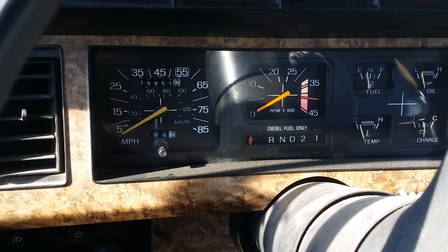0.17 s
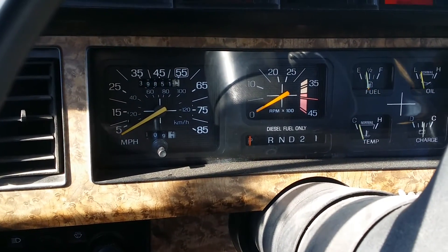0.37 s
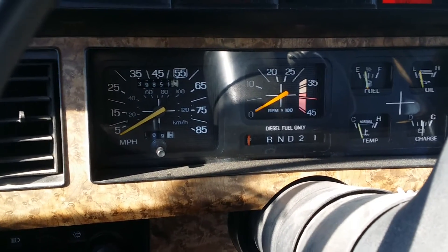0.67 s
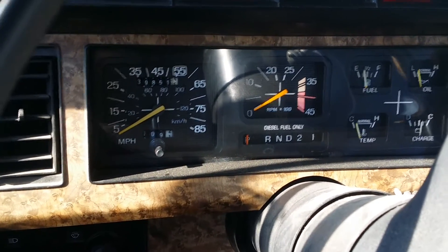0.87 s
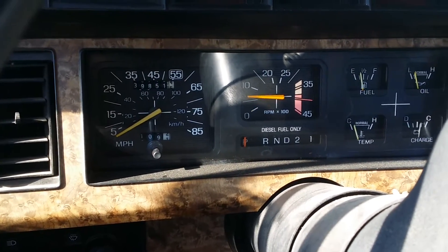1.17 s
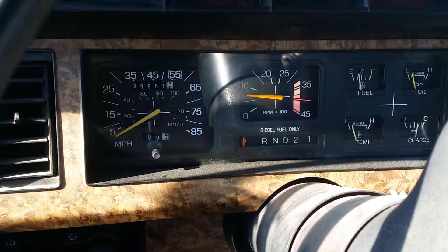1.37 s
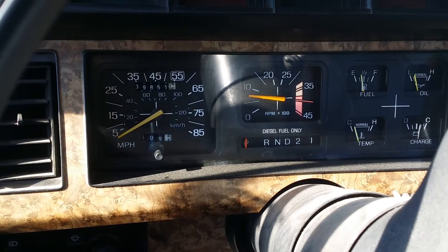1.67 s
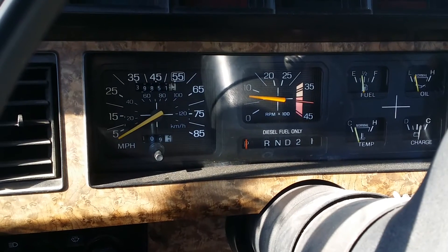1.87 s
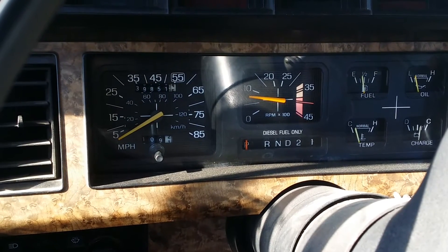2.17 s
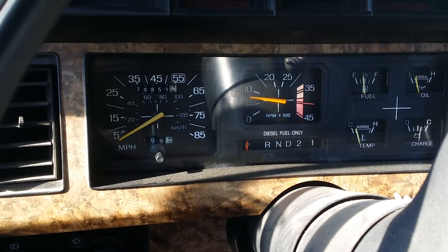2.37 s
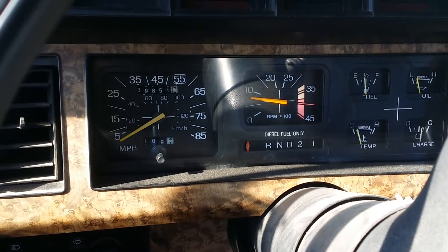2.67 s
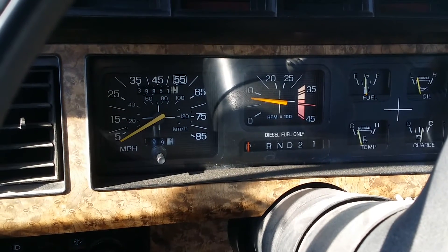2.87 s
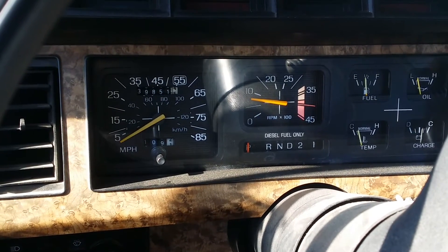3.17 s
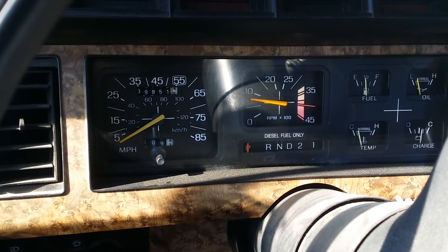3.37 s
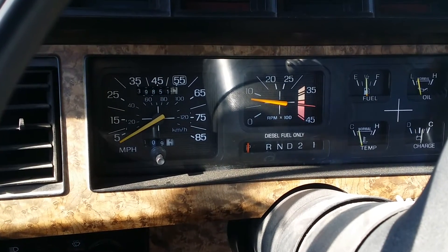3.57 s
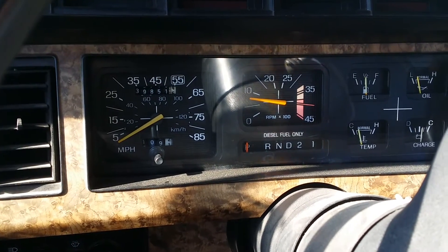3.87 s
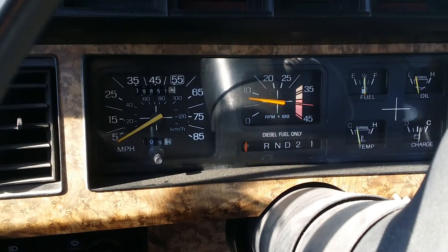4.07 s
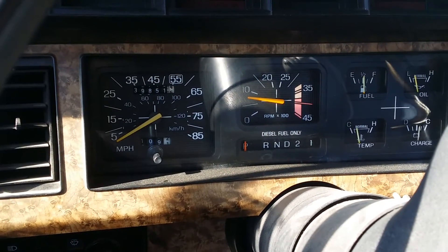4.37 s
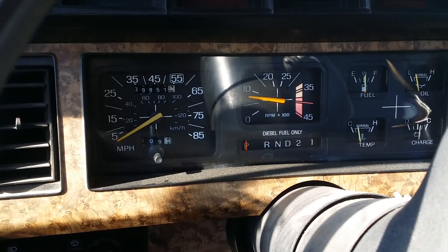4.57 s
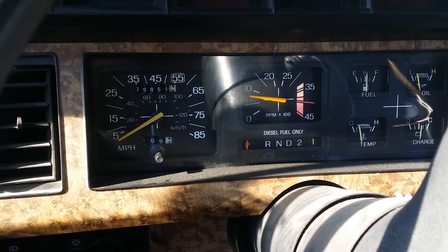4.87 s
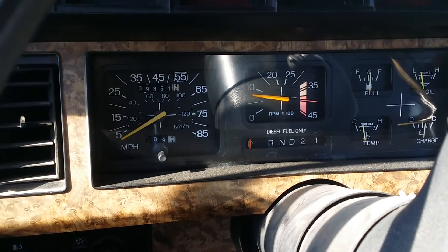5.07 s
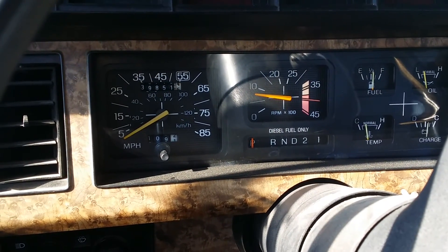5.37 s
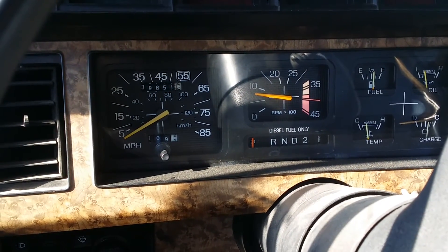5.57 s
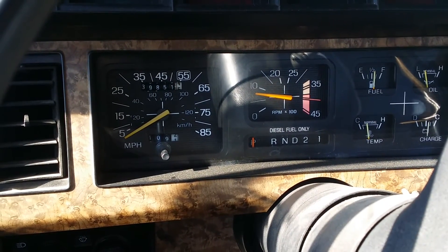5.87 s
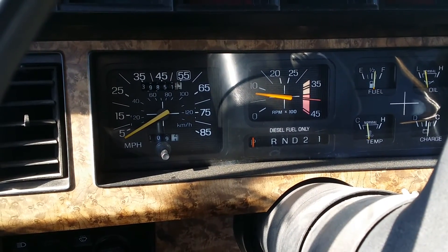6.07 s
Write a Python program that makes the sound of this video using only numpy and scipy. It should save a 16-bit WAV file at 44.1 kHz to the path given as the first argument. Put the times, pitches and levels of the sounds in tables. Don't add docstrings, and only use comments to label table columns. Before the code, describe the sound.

Close hand-held recording in a vehicle cab: quiet hum, lock ticks, then a starter bites and grinds for barely half a second. Low jolts shake plastic and keys as a big diesel fires. It idles roughly and evenly paced, with panel ringing, injector clatter, hiss and a thin belt whine. A loud electrical thump and short silence interrupt before the mono sound opens to stereo, and the idle continues.

```python
import sys
import numpy as np
from scipy import signal
from scipy.fft import rfft, irfft, next_fast_len
from scipy.io import wavfile
from scipy.ndimage import map_coordinates

SR = 44100
rng = np.random.default_rng(int(sys.argv[2]) if len(sys.argv) > 2 else 0)


def linear_from_db(decibels):
    return 10 ** (np.asarray(decibels, float) / 20)


def log_audio(samples):
    frames = np.atleast_2d(samples).T
    limited = np.clip(frames, -1, 1)
    pcm = np.round(limited * 32767).astype(np.int16)
    wavfile.write(sys.argv[1], SR, pcm)


N = 274610
T_S = np.arange(N) / SR
SWITCH_S = 2.7472
STARTER_ON_S = 0.3014


def unit(x):
    return x / np.sqrt(np.mean(x ** 2, axis=-1, keepdims=True) + 1e-20)


def along(points, hz):
    point_hz, value = np.transpose(points)
    return np.interp(np.log(hz + 1), np.log(point_hz + 1), value)


def curves(rows):
    s, *columns = np.transpose(rows)
    return [np.interp(T_S, s, column) for column in columns]


def wobble(rate_hz):
    knots = rng.standard_normal(int(N * rate_hz / SR) + 4)
    return map_coordinates(knots, [np.arange(N) * rate_hz / SR])


def noise():
    return rng.standard_normal((2, N))


def filtered(x, response):
    m = next_fast_len(N + 8192)
    return irfft(rfft(x, m) * response(np.fft.rfftfreq(m, 1 / SR)), m)[..., :N]


def coloured(x, spectrum):
    return unit(filtered(x, lambda hz: linear_from_db(along(spectrum, hz))))


def tone(hz):
    return 2 * np.pi * np.cumsum(hz) / SR


def engine():
    cycle = crank()
    return boom(cycle) + combustion(cycle) + clatter(cycle) + rumble() + grit(cycle)


# time in seconds, cycles of two crank turns in Hz.
SPEED = [(.3, 1.5), (.6, 3), (.8, 6), (.94, 6.52), (1.06, 6.82), (1.3, 6.94), (1.7, 6.96), (1.9, 7.005),
         (2.3, 7.04), (2.7, 7.1), (3.3, 7.105), (3.7, 7.08), (3.9, 7.05), (4.3, 7.035), (4.5, 7.052),
         (4.9, 7.052), (5.5, 7.076), (6.23, 7.11)]


def crank():
    strong_before_s, strong_after_s = 1.5577, 3.4879
    turns = np.cumsum(curves(SPEED)[0]) / SR
    before, after = turns[round(strong_before_s * SR)], turns[round(strong_after_s * SR)]
    return turns - np.where(T_S < SWITCH_S, before, after)


def layer_db(idle_db, growth, swells=()):
    idle_hz, solenoid_s = 7.05, 0.0078
    speed_db = 20 * np.log10(curves(SPEED)[0] / idle_hz)
    power = linear_from_db(idle_db + growth * speed_db) ** 2
    for s, db, rise_s, fall_s in swells:
        away = np.maximum((s - T_S) / rise_s, (T_S - s) / fall_s)
        power = power + linear_from_db(db - 20 * away) ** 2
    return 10 * np.log10(power) - 40 * np.clip((STARTER_ON_S - T_S) / solenoid_s, 0, 3)


# multiple of the cycle rate, level in dB.
ORDERS = [(7, -25), (8, 0), (9, -17), (10, -7), (11, -5), (12, -30), (13, -14), (14, -8), (15, -15),
          (16, 1), (17, -5), (18, -11), (19, -5), (20, -8), (21, -7), (22, -14), (23, -14), (24, -14),
          (25, -10), (26, -10), (27, -12), (28, -12), (29, -11), (30, -19), (31, -26), (32, -28), (33, -18),
          (34, -13), (35, -29), (36, -25), (37, -14)]


def order_kick(order):
    if order in (8, 16):
        early_cycles, radians = 0, -.9
    elif order > 24:
        early_cycles, radians = .088, -2.1
    elif order > 21:
        early_cycles, radians = .446, 2.1
    elif order > 15:
        early_cycles, radians = -.029, 3.6
    else:
        early_cycles, radians = -.175, 1.
    return 2 * np.pi * order * early_cycles + radians


def boom(cycle):
    scatter_rad, drift_rad, sway_db = .2, .22, 1.6
    out = np.zeros(N)
    for order, db in ORDERS:
        phase = order_kick(order) + rng.normal(0, scatter_rad) + drift_rad * wobble(3.37)
        out += linear_from_db(db + sway_db * wobble(2.51)) * np.cos(2 * np.pi * order * cycle + phase)
    return linear_from_db(layer_db(-24, 3.3)) * unit(out)


RINGS = {590: [(.01, -18.5), (.23, -11), (.5, -23.5), (.71, -14), (.83, -16)], 835: [(.05, -8), (.17, -8),
         (.29, -7), (.43, -8), (.48, -9.5), (.61, -7), (.72, -1.5), (.9, -3.5)], 1027: [(.07, -3),
         (.345, -7.5), (.385, -8), (.5, -9), (.83, -8), (.96, -2.5)], 1233: [(.33, -9), (.41, -8),
         (.51, -7.5), (.6, -15), (.78, -10.5), (.93, -1)], 1380: [(.17, -9.5), (.32, -7), (.43, -3),
         (.57, -7.5), (.66, 1), (.82, -16), (.98, -11)], 1600: [(.17, -16.5), (.29, -22.5), (.43, -1.5),
         (.59, -15.5)], 1831: [(.09, -5), (.21, 2.5), (.3, -6.5), (.47, 0.5), (.59, -4), (.72, -2.5),
         (.85, -6)], 2050: [(.05, -11), (.17, -3), (.31, -5.5), (.56, -3.5), (.7, -3.5), (.8, -15)],
         2600: [(.33, -13.5), (.55, -20), (.71, -16)], 3180: [(.07, -19.5), (.15, -17), (.46, -20),
         (.55, -19), (.74, -17)]}


def combustion(cycle):
    half_cycles, size_scatter_db = .043, 2
    drift_rad, bend, pitch_spread = .5, .02, .008
    out = np.zeros((2, N))
    count = cycle - np.floor(cycle.min()) + 1
    period_s = 1 / curves(SPEED)[0]
    for hz, strokes in RINGS.items():
        for at, db in strokes:
            size, pitch, *steps = rng.standard_normal((4, int(count.max()) + 2))
            off = (cycle - at + .5) % 1 - .5
            near = np.flatnonzero(np.abs(off) < 3 * half_cycles)
            which, off = (count[near] - at + .5).astype(int), off[near]
            start = drift_rad * np.cumsum(steps, axis=1) + 9 * np.array(steps)[:, :1]
            arch = bend * np.cos(4 * np.pi * (at + off / 2 - .1))
            bent_hz = hz * (1 + arch + pitch_spread * pitch[which])
            swell = linear_from_db(db + size_scatter_db * size[which]) * np.exp(-(off / half_cycles) ** 2)
            out[:, near] += swell * np.sin(2 * np.pi * bent_hz * off * period_s[near] + start[:, which])
    return linear_from_db(layer_db(-35.5, 3.8)) * unit(out)


# share of cycle after the strongest firing, level in dB.
KNOCKS = [(.02, -4), (.07, -3), (.16, -3), (.2, -2), (.28, -2), (.33, -3), (.43, 0), (.47, -1), (.53, -3),
          (.58, 2), (.68, -5), (.73, -4), (.78, -2), (.83, -4), (.88, -5), (.96, -1)]


def knocking(cycle, width, bed_db, scatter_db):
    force = linear_from_db(bed_db)
    for at, db in KNOCKS:
        off = (cycle - at + .5) % 1 - .5
        force = force + linear_from_db(db + scatter_db * wobble(5.26)) * np.exp(-(off / width) ** 2)
    return force


# centre in Hz, width in Hz, level in dB.
FIREWALL = [(524.4, 22, -12.5), (661, 57, -6.5), (835, 61, -7), (1028.5, 54, -2.2), (1235, 93, -18),
            (1379.5, 36, -1), (1838, 38.5, 0.5), (2061.7, 32, -3), (2374, 80, -21), (2723, 39, -16),
            (3185, 21, -15.5)]
# frequency in Hz, level in dB per Hz.
BODY = [(200, -80), (300, -3.5), (600, -22), (1100, -11), (1600, -12.5), (2200, -14), (2700, -37.5),
        (4000, -42), (8000, -39), (16000, -71.5)]


def panels(f):
    out = linear_from_db(along(BODY, f))
    for k, (hz, width_hz, db) in enumerate(FIREWALL):
        resonance = 1j * f * width_hz / (hz * hz - f * f + 1j * f * width_hz)
        out = out + (-1) ** k * linear_from_db(db) * resonance
    return out


# peak in seconds, peak in dB, rise and 20 dB fall in seconds.
CLANKS = [
    (0.353, -21.5, 0.023, 0.031),
    (.52, -33.5, 0.19, 0.087),
    (.608, -31.5, 0.007, 0.055),
    (.81, -39, 0.22, 0.085),
]


def clatter(cycle):
    share, steps, memory_cycles = .92, 1500, 5
    age = (cycle - cycle.min()) / memory_cycles
    grains = rng.standard_normal((2, int(age.max()) + 2, steps))
    old, step = age.astype(int), (cycle % 1 * steps).astype(int)
    turn = age % 1 * np.pi / 2
    grain = np.cos(turn) * grains[:, old, step] + np.sin(turn) * grains[:, old + 1, step]
    push = np.sqrt(share / 2) * grain + np.sqrt(1 - share) * noise()
    struck = push * knocking(cycle, width=.016, bed_db=-8, scatter_db=1.2)
    return linear_from_db(layer_db(-33, 1.5, CLANKS)) * unit(filtered(struck, panels))


# frequency in Hz, level in dB per Hz.
RUMBLE = [(30, -37), (50, -6.5), (118, 0), (200, 0), (300, -12.5), (500, -20.5), (900, -17), (1500, -57)]
# peak in seconds, peak in dB, rise and 20 dB fall in seconds.
HEAVES = [
    (.32, -25.5, 0.058, 0.01),
    (0.381, -19, 0.084, 0),
    (0.829, -19, 0.234, 0.1365),
]


def rumble():
    return coloured(noise(), RUMBLE) * linear_from_db(layer_db(-32, 0.22, HEAVES) + 1.8 * wobble(20))


# frequency in Hz, level in dB per Hz.
GRIT = [(1500, 0.5), (2600, 3.5), (3300, 1), (4500, -3), (5300, -1.3), (5700, -3.5), (6300, -0.8),
        (7200, -7), (7700, -11.5), (10000, -16.5), (12500, -17), (15000, -24.5), (16000, -46)]
# frequency in Hz, level in dB per Hz.
INJECTORS = [(5000, -40), (7500, -7.5), (10500, -9.5), (13000, -17), (15500, -5.5)]
LEAKS = [
    (.09, .9, .07),
    (.61, .7, .05),
]
# peak in seconds, peak in dB, rise and 20 dB fall in seconds.
GRINDS = [
    (0.302, -33, 0.0092, 0.084),
    (0.353, -31, 0.073, 0.031),
    (.5, -62.5, .3, 0.286),
    (.62, -50, 0.11, 0.25),
    (.82, -40, 0.45, 0.284),
    (1.28, -43.5, 0.65, 0.034),
]


def grit(cycle):
    turn_db = 0.78 * np.cos(4 * np.pi * (cycle - .08))
    pulse = knocking(cycle, width=0.05, bed_db=16, scatter_db=-7.0) * linear_from_db(turn_db)
    out = coloured(pulse * noise(), GRIT)
    ticks = knocking(cycle, width=.008, bed_db=-14, scatter_db=3) / 1.4
    for at, size, length in LEAKS:
        ticks = ticks + size * linear_from_db(3 * wobble(4)) * np.exp(-((cycle % 1 - at) / length) ** 2)
    out += linear_from_db(-13) * coloured(ticks * noise(), INJECTORS)
    return linear_from_db(layer_db(-45, 0.59, GRINDS)) * out


# start in seconds, peak in dB, pitch
# in Hz.
JOLTS = [(0.309, -17.5, 234), (0.343, -12.5, 135), (0.4, -10, 120), (0.469, -24.5, 353), (0.51, -37.5, 192),
         (0.61, -17, 112.5), (0.656, -18.5, 152), (0.688, -18.5, 96.4), (0.721, -13, 117.3),
         (0.755, -7.5, 83.7), (0.799, -16.5, 114.7), (0.845, -6, 86.7), (0.9, -5.5, 73.3),
         (.954, -14.5, 327), (0.929, -5.5, 73), (0.953, -12, 100.4), (2.7318, -18.5, 355.4),
         (2.7395, -13.5, 180), (2.736, -28.5, 574), (.12, -47.5, 62), (0.451, -20, 58), (0.977, -12, 112.6),
         (1.003, -22, 140), (4.286, -16.5, 317.4), (4.289, -24.5, 490), (5.898, -23.5, 258)]


def shudder():
    out, t = np.zeros(N), np.arange(SR // 4) / SR
    for s, db, hz in JOLTS:
        t60_s = 0.065 + 3.4 / hz
        decay = linear_from_db(db + 2.0 - 60 * t / t60_s) * (1 - np.exp(-t / 0.0042))
        out[round(s * SR):][:len(t)] += decay * np.sin(2 * np.pi * hz * t)
    return out


# time in seconds, pitch in Hz, level in dB.
STARTER = [(.33, 809, -48), (.36, 813, -37), (.41, 835, -42), (.44, 992, -38), (.475, 1043, -30),
           (.495, 1004, -27.5), (.512, 887.6, -40), (.535, 835, -42.5), (.58, 825, -53)]


def starter():
    hz, db = curves(STARTER)
    phase = tone(hz * (1 + .007 * wobble(250)))
    octave = linear_from_db(-10 + 5.5 * wobble(86.9)) * np.sin(2 * phase)
    mesh = linear_from_db(db + 11.5 + 2.3 * wobble(70.6)) * (np.sin(phase) + octave)
    engaged = (T_S > STARTER[0][0]) * (T_S < STARTER[-1][0])
    return filtered(mesh * engaged, lambda f: panels(f) + linear_from_db(-10.5))


# start in seconds, end in seconds, pitch in Hz, level in dB.
SQUEALS = [(0.29, 0.43, 5320, -53), (.36, 0.567, 3200, -49), (.46, 0.51, 2100, -32), (0.7, .705, 2830, -36),
           (0.37, 0.47, 2250, -41), (.42, 0.54, 4200, -48.5), (.415, 0.48, 2760, -48.5),
           (0.43, 0.82, 2760, -48), (.35, 0.414, 3700, -50.5), (.39, .43, 4900, -51),
           (0.57, .63, 4200, -50.5), (0.47, 0.76, 1700, -47), (0.75, 0.73, 2980, -48),
           (0.64, 0.82, 3200, -47), (.45, .58, 332, -33), (.53, 0.72, 5300, -51), (.54, 0.73, 3200, -45.5),
           (.59, 0.7, 3100, -40), (.51, 0.567, 2350, -44), (0.326, .343, 1800, -29),
           (0.35, 0.36, 1950, -21), (.33, 0.37, 2170, -32), (0.36, 0.381, 1370, -36.5),
           (.365, 0.418, 1590, -43), (.425, 0.43, 1830, -40), (.495, 0.51, 1800, -21),
           (0.6, .617, 1270, -28.5), (.615, 0.66, 1050, -36), (.606, 0.619, 2400, -40),
           (0.8, 0.586, 1850, -39.5), (.61, .65, 2150, -42), (.662, 0.7, 1175, -33), (.685, .71, 1850, -43),
           (0.62, 0.77, 2000, -41), (.76, 0.739, 1830, -25), (.785, 0.817, 1800, -35),
           (0.77, 0.822, 650, -28), (1, .808, 4400, -42), (0.93, .872, 1850, -41.5),
           (0.84, 0.94, 3250, -42), (.908, 0.94, 1830, -28)]


def squeals():
    out = np.zeros(N)
    flutter, waver = linear_from_db(5.5 * wobble(180) - 2), .014 * wobble(300)
    for start_s, end_s, hz, db in SQUEALS:
        span = np.arange(round(start_s * SR), round(end_s * SR))
        swell = np.sin(np.pi * np.arange(len(span)) / len(span)) ** .6
        look = span + rng.integers(0, N // 2)
        phase = tone(hz + min(hz, 2600) * waver[look])
        out[span] += linear_from_db(db) * swell * flutter[look] * np.sin(phase)
    return out


WHINE_ON_S = 0.8825


def driven():
    return np.clip((T_S - WHINE_ON_S) / 0.05, 0, 1)


def belt_pump():
    strokes_per_cycle = 50.02
    phase = tone(strokes_per_cycle * curves(SPEED)[0] * (1 + .0025 * wobble(14)))
    db = -34 + 3.5 * np.exp(-np.abs(T_S - WHINE_ON_S) / 1.51)
    lines = np.sin(phase) + linear_from_db(-19) * np.sin(1.157 * phase)
    return driven() * linear_from_db(db + 3 + 0.34 * wobble(25.14)) * lines


def fuel_pump():
    load = np.clip((T_S - STARTER_ON_S) / 0.099, 0, 1)
    hum = np.sin(tone(308 - 11.23 * load))
    return linear_from_db(-41.5 + 1 - load) * (1 - driven()) * hum


# pitch in Hz, level in dB.
RELAY = [
    (102.3, -45),
    (204.6, -40),
    (403.7, -62.5),
    (506, -65),
    (608.3, -68),
]


def relay():
    hum = sum(linear_from_db(db + 3.5 + 1.52 * wobble(7.1)) * np.sin(2 * np.pi * hz * T_S) for hz, db in RELAY)
    return hum * np.clip((.72 - T_S) / 0.107, 0, 1)


# start in seconds, peak in dB.
KEYS = [(0.6529, -23.5), (0.6644, -42), (0.737, -14.5), (0.757, -15), (0.769, -20), (0.7793, -22.5),
        (0.7924, -19), (0.8054, -28), (0.8145, -22), (0.8212, -21), (0.836, -19.5), (0.857, -19.5),
        (0.8692, -18.5), (0.8814, -47.5), (0.8979, -39), (0.9144, -27), (0.9674, -30.5), (0.9911, -27),
        (1.0444, -36.5)]
# start in seconds, peak in dB, top share in dB, t60 in seconds.
TAPS = [(.1735, -41, -28, 0.061), (.1942, -33.5, -3, .015), (.2165, -40, -30, .04), (.2299, -39, -8, 0.032),
        (0.2828, -35.5, -39, 0.018), (0.394, -36, -21, 0.0315), (0.689, -21.5, -21.5, 0.022),
        (4.6778, -33.5, -27, 0.071), (5.6038, -7, -12.5, 0.055), (5.604, -14, -5, 0.0089),
        (5.6056, -2.5, -1, 0.0027)]
# frequency in Hz, level in dB per Hz.
RATTLE = [(700, -45), (1500, 0), (3000, -3), (4500, -2), (6300, 1), (8000, -4), (9500, -9), (11000, -13)]
# frequency in Hz, level in dB per Hz.
JINGLE = [(7000, -40.5), (9000, -1), (10500, 1), (12500, -2), (15000, -1.5), (16000, -24)]


def rattles():
    key_top_db, key_t60_s, key_scatter = -11, .043, .25
    shake, t = np.zeros((2, N + SR)), np.arange(SR // 8) / SR
    keys = [(s, db, key_top_db, key_t60_s * np.exp(key_scatter * rng.standard_normal())) for s, db in KEYS]
    for s, db, top_db, t60_s in keys + list(TAPS):
        shares_db = np.array([[0], [top_db]])
        burst = linear_from_db(db - 6.5 + shares_db - 60 * t / t60_s) * (1 - np.exp(-t / (0.039 * t60_s)))
        shake[:, round(s * SR):][:, :len(t)] += burst
    return shake[0, :N] * coloured(noise(), RATTLE) + shake[1, :N] * coloured(noise(), JINGLE)


# start in seconds, pitch in Hz, level in dB.
CLINKS = [(.175, 5000, -51.5), (.175, 3700, -53.5), (.1725, 1900, -50), (.1942, 7920, -49),
          (5.6045, 10250, -24), (5.6045, 12880, -29.5), (5.606, 3780, -23.5), (5.609, 6300, -25),
          (.229, 3120, -46.5), (.23, 6830, -57.5), (.284, 5200, -59), (.737, 6020, -34.5),
          (.7375, 11220, -32), (.7575, 5660, -23), (.758, 6340, -26), (.7575, 9980, -34), (.769, 7600, -32),
          (.766, 11600, -40), (.7804, 5700, -30.5), (0.78, 7870, -26.5), (.794, 7640, -26.5),
          (.797, 5300, -37), (.8203, 4480, -34), (.815, 5960, -28.5), (0.8364, 5780, -30),
          (0.8375, 8920, -27.5), (.848, 5600, -32), (.862, 5700, -31.5), (.8702, 12400, -24),
          (0.8704, 11700, -29), (0.8697, 5090, -31), (.8702, 8200, -30), (.898, 6730, -34),
          (.914, 8800, -44)]


def clinks():
    out, t = np.zeros(N), np.arange(SR // 10) / SR
    t60_s = 0.041
    for s, hz, db in CLINKS:
        jitter_rad = np.cumsum(rng.normal(0, .12, len(t)))
        decay = linear_from_db(db - 60 * t / t60_s) * (1 - np.exp(-t / 0.0005))
        out[round(s * SR):][:len(t)] += decay * np.sin(2 * np.pi * hz * t + jitter_rad)
    return out


# frequency in Hz, level in dB per Hz.
QUIET = [(18, -49), (30, -9), (153, -1), (204, -15.5), (252, -7.5), (311, -8.5), (461, -21.5),
         (1430, -36.5), (14800, -43.5), (16000, -49)]


def quiet_cab():
    return linear_from_db(-42.0) * coloured(noise(), QUIET)


# frequency in Hz, likeness from 0 to 1.
ALIKE = [(60, 0.57), (150, 0.87), (300, 1), (600, 0.83), (1200, 0.13), (2000, 1), (3500, 0.207),
         (7000, 0.12), (15000, 0.13)]
# frequency in Hz, level in dB.
LEFT = [(60, -4), (110, -8.5), (200, -2), (300, -8), (352, -8), (410, 3.5), (520, -3.5), (700, -5),
        (950, -0.5), (1290, -7.5), (1620, 1), (1840, -1), (2380, -0.5), (3200, -4), (5500, -0.5),
        (8120, -2.5), (15000, 1)]
# frequency in Hz, lead in radians.
LEAD = [(0, -1), (430, 2), (950, -1), (1460, -3.5), (2150, -0.52), (2760, -1.5), (4820, -10), (6290, -37.5),
        (8350, -18), (9820, -30), (11700, -18), (12400, -18.5), (14400, -34), (16100, -39.5)]


def scene():
    sources = engine() + shudder() + starter() + squeals() + belt_pump() + fuel_pump() + relay()
    right, other = sources + clinks() + rattles() * linear_from_db([[0], [-3]]) + quiet_cab()

    def mix(hz):
        alike = np.clip(along(ALIKE, hz), 0, 1)
        lead = np.exp(1j * np.interp(hz, *np.transpose(LEAD)))
        return linear_from_db(along(LEFT, hz)) * [alike * lead, np.sqrt(1 - alike ** 2)]

    left = filtered(np.array([right, other]), mix).sum(axis=0)
    return np.array([left, right])


def surge(x):
    surge_s, surge_db, surge_hz, fade_s, rise_s = 2.7312, 14.5, 45, .007, .0016
    x = x * (1 - .75 * np.clip(1 + (T_S - surge_s) / fade_s, 0, 1) * (T_S < surge_s))
    gate = np.clip((T_S - surge_s) / rise_s, 0, 1) * (T_S < SWITCH_S)
    extra = (linear_from_db(surge_db) - 1) * x * gate
    return x + filtered(extra, lambda f: (1j * f / (surge_hz + 1j * f)) ** 2)


# time in seconds, left step, right step (1 is
POPS = [
    (2.7312, -.5, -.5),
    (2.7471, .04, .04),
    (2.7928, -.07, .02),
    (2.8391, .46, 0),
    (2.8414, .3, 0),
    (2.8659, .56, 0),
    (2.8664, .36, 0),
    (3.0022, .4, .01),
    (4.2951, -.1, -.08),
    (5.8977, .48, 0),
]


def pops():
    jumps = np.zeros((2, N))
    for s, left, right in POPS:
        jumps[:, round(s * SR)] = left, right

    def ring(f, hz=130, width_hz=75):
        resonance = 1j * f / (hz * hz - f * f + 1j * f * width_hz)
        return SR / (2 * np.pi) * resonance * 1j * f / (240 + 1j * f) / (1 + 1j * f / 5500)

    return .8 * filtered(jumps, ring)


def roll_off(x):
    return signal.sosfilt(signal.butter(12, 16540, fs=SR, output="sos"), x)


# frequency in Hz, level in dB.
MONO = [(50, -0.5), (113, 1.5), (160, 1.32), (350, -0.5), (520, 2.5), (800, -0.08), (2060, 0), (3200, 0.24),
        (5500, -1.5), (8000, -2.49)]
# start in seconds, left in dB, right in dB.
GAIN_STEPS = [
    (0, -0.5, -0.5),
    (2.7472, -50, -50),
    (2.752, -58, -61),
    (2.768, -62, -62),
    (2.7923, -11, -70),
    (2.8968, -8.5, -6),
]


def record(dry):
    dry = filtered(dry, lambda f: 1 / (1 + (f / 15250) ** 200) / (1 + (44 / (f + 1)) ** 6))
    mono = filtered(dry[1], lambda f: linear_from_db(along(MONO, f)))
    start_s, *gain_db = np.transpose(GAIN_STEPS)
    stereo_db = 5 - 5 * np.exp(-np.abs(T_S - start_s[-1]) / 0.71)
    stereo = dry * linear_from_db(stereo_db + [[1.2], [0]])
    x = surge(np.where(T_S < SWITCH_S, mono, stereo))
    x = x * linear_from_db(np.array(gain_db)[:, np.searchsorted(start_s, T_S, side="right") - 1])
    x = x + pops()
    x = x / (1 + np.abs(x / .9) ** 8) ** (1 / 8)
    x = filtered(x, lambda f: 1 / (1 + (f / 16300) ** 60))
    return roll_off(x)


dry = scene()
out = record(dry)
log_audio(out)
```